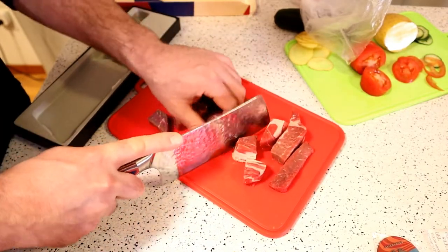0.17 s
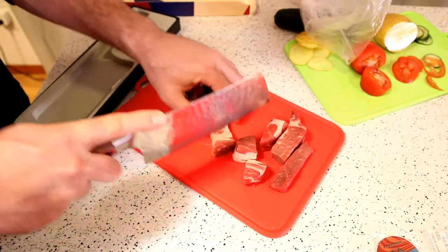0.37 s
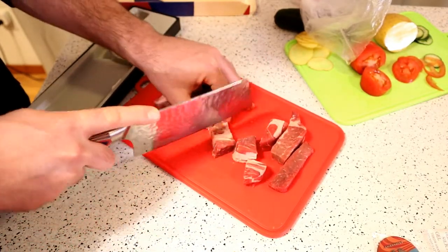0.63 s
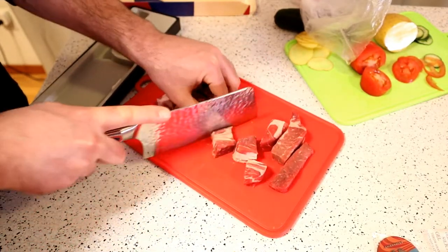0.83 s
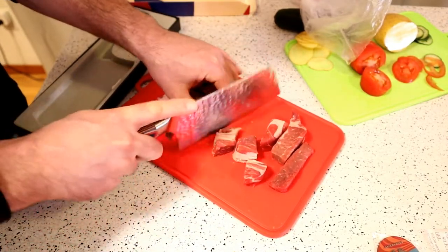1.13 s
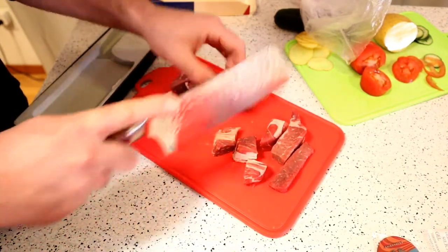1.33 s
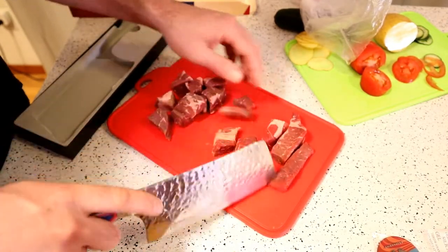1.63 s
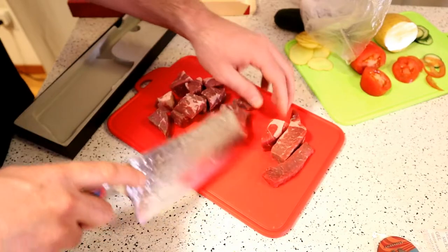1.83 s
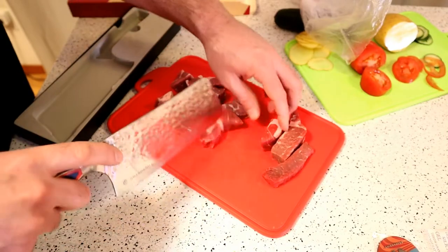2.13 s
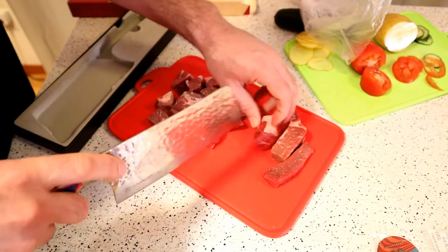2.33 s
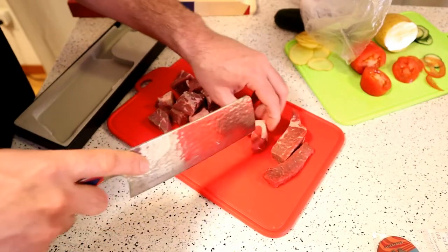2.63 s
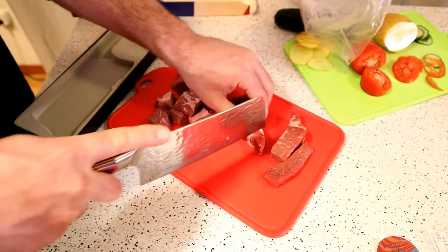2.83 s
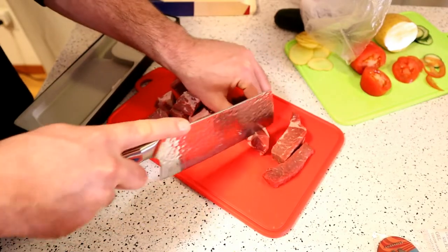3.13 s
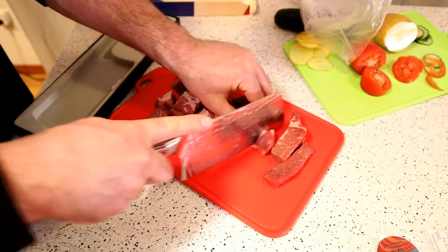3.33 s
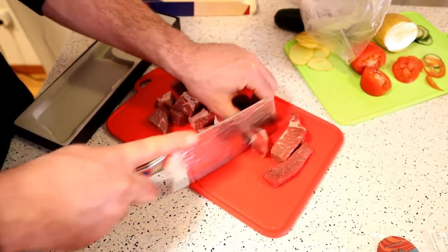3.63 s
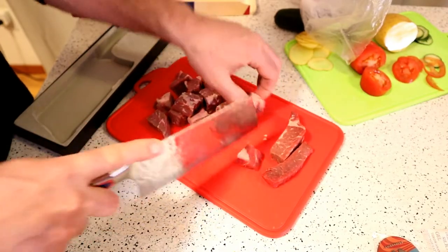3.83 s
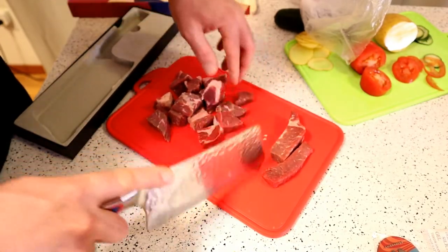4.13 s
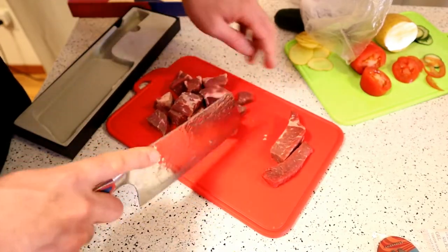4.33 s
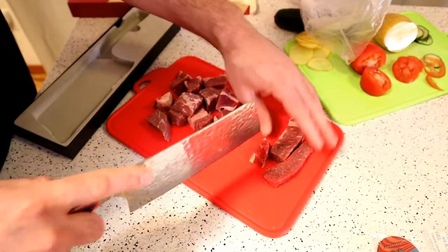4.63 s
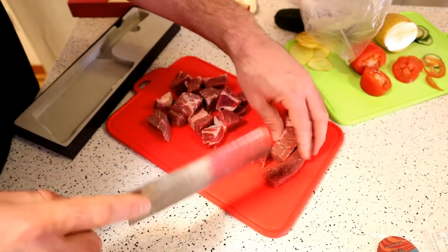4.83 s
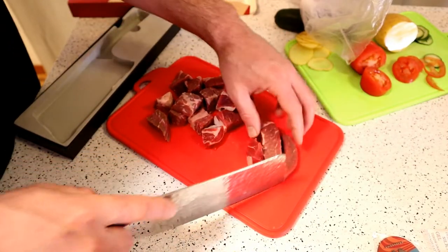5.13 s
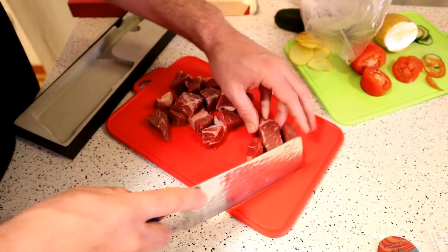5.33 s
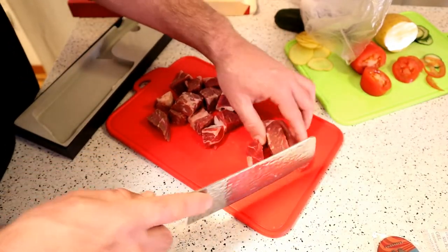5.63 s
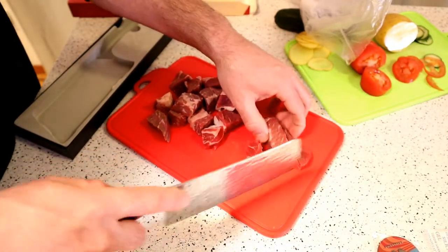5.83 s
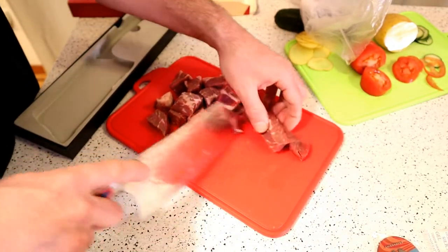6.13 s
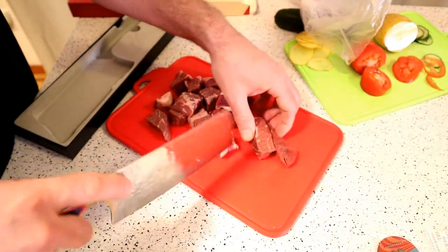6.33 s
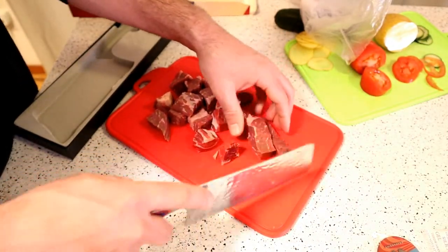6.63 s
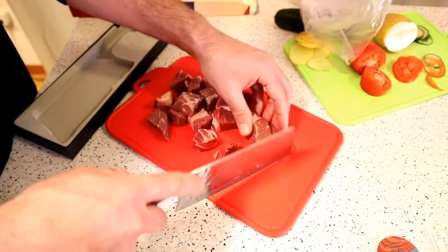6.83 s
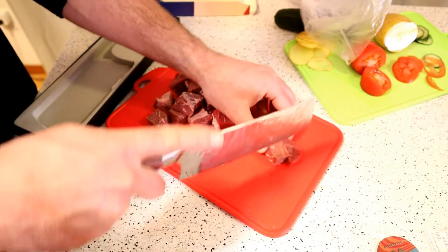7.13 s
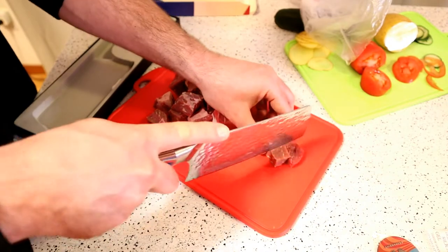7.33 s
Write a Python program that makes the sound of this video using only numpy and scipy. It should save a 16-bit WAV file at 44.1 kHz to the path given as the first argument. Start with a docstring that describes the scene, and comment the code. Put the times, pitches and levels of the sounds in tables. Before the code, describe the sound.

Loud cleaver knocks on a plastic cutting board come in irregular bursts, with dragging scrapes and faint wet meat ticks between them.

```python
"""A knock already dying away opens the scene: a cleaver cuts meat on a plastic board, an arm's length off.
Each stroke rings board and counter modes and adds a noise crack; the loudest knocks clip.
Between strokes the dragged edge scrapes (uneven noise through resonances), the steel rings in decaying modes,
and wet meat ticks and rustles in band noise. Two diffuse tails and a wall slap make the small kitchen;
shaped noise is its air, narrow noise bands the hum of a fridge."""
import sys
import numpy as np
from scipy import signal
from scipy.fft import rfft, irfft
from scipy.io import wavfile

SR = 44100
rng = np.random.default_rng(int(sys.argv[2]) if len(sys.argv) > 2 else 0)


def put_to_file(sound):
    """Save the sound as 16-bit audio at rate SR, in the file named by the first command-line argument."""
    columns = np.atleast_2d(sound).T  # one column per channel
    safe = np.clip(columns, -1, 1)
    whole_steps = np.round(safe * 32767)
    wavfile.write(sys.argv[1], SR, whole_steps.astype(np.int16))


N = 330288
LEAD = 2048  # samples kept ahead of time zero, for the stroke that starts there
SWAY_HZ = 33.3  # the counter on its frame

# Modes of the freely ringing steel. Each row: pitch in Hz, level in dB, t60 in s.
BLADE_MODES = [(2519, -4, .12), (3278, -12, .12), (4180, -14, .15), (5030, -14, .1), (5722, -2, .2),
               (6374, 0, .2), (7100, -14, .3), (7400, -14, .2), (8516, -4, .14), (8786, -14, .15),
               (10080, -5, .12), (10470, -12, .12), (10800, -14, .15), (11580, -11, .12), (12270, -14, .1),
               (13040, -16, .1), (14500, -16, .08)]


def undb(db):
    """Gain of a level in dB."""
    return 10 ** (np.asarray(db) / 20)


def band(x, hz, width_hz):
    """Two-pole resonance, gain 1 at the centre."""
    return signal.lfilter(*signal.iirpeak(hz, hz / width_hz, fs=SR), x)


def steep_band(x, hz, width_hz):
    """The same resonance twice in a row, for steeper skirts."""
    return band(band(x, hz, width_hz), hz, width_hz)


def level(x, db):
    """Set the rms in dB."""
    return x * undb(db) / np.sqrt(np.mean(x ** 2))


def fade(t60_s, count):
    """Exponential decay over count samples, 60 dB down at t60."""
    return np.exp(-np.log(1000) * np.arange(count) / SR / t60_s)


def walk(rate_hz, size):
    """Random drift of spread near 1 that takes a new aim rate_hz times a second."""
    aims = rng.standard_normal(size=2000)
    # sqrt(1.5) restores the spread lost between aims
    return np.sqrt(1.5) * np.interp(np.arange(size) * rate_hz / SR, np.arange(len(aims)), aims)


def burst(hz, width_hz, t60_s, count=2048):
    """A short dying noise around one band, peak 1."""
    y = steep_band(rng.standard_normal(count) * fade(t60_s, count), hz, width_hz)
    return y / np.abs(y).max()


def ring(modes, scatter_db, detune, contact_ms, spot_hz, focus_db_per_octave, count=22050):
    """One blow, peak 1: the spot that is hit favours the modes near spot_hz; a longer push is duller."""
    t = np.arange(count) / SR
    y = np.zeros(count)
    for hz, db, t60_s in modes:
        sign_draw, level_draw, pitch_draw = rng.standard_normal(3)
        octaves_off = abs(np.log2(hz / spot_hz))
        share = undb(db + scatter_db * level_draw - focus_db_per_octave * octaves_off)
        # more modes first swing away from the microphone than towards it
        sign = np.sign(sign_draw - .4)
        tone = np.sin(2 * np.pi * hz * (1 + detune * pitch_draw) * t)
        y += sign * share * tone * fade(t60_s, count)
    # double low-pass at 1000 / contact_ms Hz
    pole = np.exp(-2000 * np.pi / (SR * max(contact_ms, .01)))
    y = signal.lfilter([1], [1, -2 * pole, pole ** 2], y)
    return y / np.abs(y).max()


def add(track, s, x):
    """Mix a sound in at time s."""
    i = int(s * SR) + LEAD
    track[i:i + len(x)] += x[:len(track) - i]


def background():
    """Steady room air and microphone hiss, the wavering hum of the fridge, the counter's restless sway."""
    # Spectrum of air and hiss. Each row: frequency in Hz, relative density in dB.
    air_curve = np.array([(29, -47), (50, -9.5), (119, -6.5), (223, -10), (258, 2), (284, -15.5),
                          (337, -14), (545, -18), (678, -19), (1120, -24), (2060, -26.5), (9410, -31.5),
                          (16000, -37)])
    # Hum. Each row: pitch in Hz, width in Hz, rms level in dB.
    hum_bands = [(136, 0.5, -75.5), (251.3, 2.7, -74)]
    air_db, sway_rest_db = -50.5, -60.5  # rms
    hz = np.maximum(np.arange(N // 2 + 1) * SR / N, 1)
    shape = undb(np.interp(np.log(hz), np.log(air_curve[:, 0]), air_curve[:, 1]))
    air = level(irfft(rfft(rng.standard_normal(N)) * shape, N), air_db)
    hum = sum(level(band(rng.standard_normal(N), f, width_hz), db) for f, width_hz, db in hum_bands)
    sway = steep_band(rng.standard_normal(N), SWAY_HZ, 14) * undb(2.7 * walk(3.4, N))
    return air + hum + level(sway, sway_rest_db)


def diffuse(count=30000):
    """One diffuse tail that builds up gradually and dies band by band."""
    # Kitchen reverberation. Each row: band in Hz, level in dB, t60 in s.
    tail_bands = [(136.6, -2.5, 0.091), (231.6, 0, 0.31), (440, -3.5, 0.32), (1050, -7, 0.4),
                  (1850, -6, 0.35), (4010, -7.5, 0.37), (7860, -11.5, 0.41), (13000, -38.5, 0.033)]
    build = 1 - fade(0.031, count)
    tail = np.zeros(count)
    for hz, db, t60_s in tail_bands:
        noise = steep_band(rng.standard_normal(count), hz, 0.82 * hz)
        part = noise * fade(t60_s, count) * build
        tail += undb(db) * part * np.sqrt(hz / SR / np.sum(part ** 2))
    return tail


def kitchen(x):
    """Hands and blade move about, so every blow meets another blend of two tails; the far wall slaps dully."""
    turns_per_s, far_wall_s, far_wall_db = .6, .043, -8.5
    turn = 2 * np.pi * turns_per_s * np.arange(len(x)) / SR
    wet = sum(signal.fftconvolve(x * share, diffuse())[:len(x)] for share in (np.cos(turn), np.sin(turn)))
    slap = band(np.roll(x, int(far_wall_s * SR)), 170, 190)
    return x + wet + undb(far_wall_db) * slap


def rustle():
    """Hands move the meat: soft grainy band noise swells and fades in the treble."""
    # Each row: loudest moment in s, half length in s, level in dB.
    swells = [(.3, 0.49, -68), (2.0, 0.17, -70), (3.402, 0.076, -56), (6.503, 0.42, -60.5), (7.27, .1, -65)]
    t = (np.arange(N + LEAD) - LEAD) / SR
    swell = sum(undb(db) * np.clip(1 - ((t - s) / half_s) ** 2, 0, 1) for s, half_s, db in swells)
    grain = rng.standard_normal(len(t)) * undb(2.5 * walk(40, len(t)))
    return swell * level(steep_band(grain, 5000, 2000), 0)


def wet_ticks():
    """Sticky meat lets go: very short bursts of band noise."""
    # Each row: start in s, peak level in dB, pitch in Hz.
    snaps = [(.13, -39, 5000), (0.239, -46, 4200), (.486, -38, 5200), (.603, -46, 7000),
             (1.8157, -33.5, 8700), (2.0494, -38, 6080), (2.21, -44.5, 10500), (2.3306, -42, 5940),
             (2.361, -40.5, 6950), (2.6449, -44, 7570), (2.7332, -44, 9200), (2.8065, -44.5, 4710),
             (2.825, -44, 7790), (3.1783, -31.5, 5150), (3.2687, -42, 4460), (3.3365, -40, 5640),
             (3.3954, -34.5, 6100), (3.4207, -37.5, 5870), (4.4238, -37, 4400), (4.702, -42.5, 3540),
             (4.918, -29.5, 3600)]
    out = np.zeros(N + LEAD)
    for s, db, hz in snaps:
        add(out, s, undb(db) * burst(hz, 0.9 * hz, 0.011))
    return out


def scrapes():
    """Dense uneven slips of the edge drive the board's broad resonances and the steel's thin ones."""
    # Each row: full pressure at s, rise in s, hold in s, fall in s, level in dB, steel over board in dB.
    drags = [(0.204, 0.11, 0.058, .06, -54, -20), (.935, 0.07, .008, .005, -47, 1),
             (1.078, 0.093, .02, 0.14, -36, 0), (1.738, 0.017, .012, .03, -52.5, -2),
             (1.954, 0.17, .06, .09, -51, 8.5), (3.441, 0.048, .008, .005, -44.5, -5),
             (3.681, 0.047, .18, 0.028, -40, 4), (4.919, 0.012, .006, 0.024, -44, -10.5),
             (4.979, 0.012, .03, 0.05, -32.5, -23), (5.325, 0.062, .03, 0.066, -35.5, -5.5),
             (5.724, .03, .012, .04, -53.5, 11), (5.77, .006, 0.013, 0.026, -50, -14),
             (5.835, .006, .012, 0.025, -42, -10.5), (5.871, .04, .06, 0.053, -47, -13),
             (6.12, 0.021, 0.032, 0.0063, -30.5, 18), (7.223, 0.037, .07, 0.044, -64.5, -5)]
    # Board and pressed steel under the edge. Each row: pitch in Hz, width in Hz, level in dB.
    rubbed = [(962, 230, 1.5), (1270, 300, 1.5), (1750, 640, -3.5), (2385, 260, -2), (2670, 510, -4),
              (3235, 120, -5.5), (3730, 450, -2), (4600, 140, -5), (5230, 540, -4), (6200, 330, -6.5),
              (7430, 230, -12), (8550, 420, -15.5), (9200, 1200, -28.5)]
    swell_db = 20  # gained over the rise, lost over the fall
    biggest_slip_db = 18
    size = N + LEAD
    t = (np.arange(size) - LEAD) / SR
    slip_db = np.minimum(3 * rng.exponential(size=size), biggest_slip_db)
    slips = level(rng.standard_normal(size) * undb(slip_db + walk(80, size)), 0)
    board, steel = np.zeros(size), np.zeros(size)
    for s, rise_s, hold_s, fall_s, db, steel_db in drags:
        # 0 under full pressure, 1 a rise before and a fall after; the edge lifts off beyond that
        away = np.maximum(np.maximum((s - t) / rise_s, (t - s - hold_s) / fall_s), 0)
        pressure = undb(db - swell_db * away) * np.clip(2 - away, 0, 1)
        board += pressure
        steel += pressure * undb(steel_db)
    rub, sing = 0, 0
    # the contact moves along the edge, so each resonance swells on its own
    for hz, width_hz, db in rubbed:
        swell = undb(db + 3 * walk(18, size))
        tone = band(band(slips * board, hz, 3 * width_hz), hz, width_hz)
        rub += swell * tone * np.sqrt(SR / width_hz)
    for hz, db, t60_s in BLADE_MODES:
        swell = undb(db + 2 * walk(9, size))
        sing += swell * band(slips * steel, hz, 1.6 / t60_s) * np.sqrt(SR * t60_s)
    return undb(-10.5) * rub + undb(-33.5) * sing


def blade():
    """Steel struck on its flat rings, with the tick of the contact; what touches it shortens the ring."""
    # Each row: start in s, ring peak in dB, tick over ring in dB, favoured pitch in Hz, t60 over free t60.
    taps = [(6.1608, -11, -12, 6370, 0.76), (6.2592, -16.5, 6, 8500, 0.56)]
    retouch_damp_db = 9
    out = np.zeros(N + LEAD)
    for s, db, tick_db, spot_hz, freedom in taps:
        modes = [(hz, mode_db, t60_s * freedom) for hz, mode_db, t60_s in BLADE_MODES]
        steel = ring(modes, 0.93, 0, 0.11, spot_hz, 0.83)
        tick = undb(tick_db) * burst(5100, 8000, 0.035, count=22050)
        out[int(s * SR) + LEAD:] *= undb(-retouch_damp_db)  # a new touch chokes what still rings
        add(out, s + 0.001013, undb(db) * (steel + tick))
    return out


def knocks():
    """Blade or hand lands: board modes and slap, counter thud and sway, a short crack of the edge."""
    # Each row: start in s, peak levels of knock, thud, crack and sway in dB ahead of the filters,
    # contact in ms, knock pitch in Hz, thud pitch in Hz.
    strokes = [(-.022, 2.5, -16.5, -11.5, -40, 0.076, 960, 165),
               (0.354, -56, -44, -56, -70, 0.31, 466, 253), (.464, -44, -40, -51, -53, 0.55, 468, 205),
               (0.487, -37.5, -36.5, -44.5, -70, .35, 960, 264), (.82, -18, -23.5, -60, -41, 1, 790, 210),
               (.944, -3, -19, -50, -54, 0.36, 895, 334), (.975, -16, -14.5, -56, -60, 0.52, 940, 266),
               (1.085, -15, -22, -37, -43, 0.59, 800, 210), (1.78, -17.5, -23.5, -57, -40, 0.86, 780, 207),
               (2.51, -34.5, -31, -51, -56, 1, 484, 280), (2.697, -43.5, -53, -44.5, -67, 0.32, 942, 258),
               (3.196, -20.5, -23, -53.5, -49, 1, 791, 205), (3.4525, 3, -11, -18, -54.5, 0.31, 880, 239),
               (3.929, -25.5, -28.5, -64.5, -47.5, 1, 775, 205),
               (4.293, -0.5, -13, -15, -45, .34, 980, 223), (4.407, -20.5, -22, -55, -42.5, 1, 790, 199),
               (4.876, -10.5, -16, -40.5, -35.5, 0.37, 784, 207),
               (5.1322, 4, -7.5, -11, -51.5, .32, 1364, 223), (5.382, -22.5, -24, -50, -50, 0.43, 800, 207),
               (5.655, -25.5, -25, -48, -50.5, 1, 734, 242),
               (5.79, -34, -25.5, -45.5, -53.5, .95, 754, 256),
               (5.822, -22, -29, -24.5, -56, 0.18, 911, 210), (6.03, 3, -35.5, -2, -49, .17, 822, 350),
               (6.033, 0, -15, -11.5, -60, 0.25, 1350, 198), (6.093, -10, -26, -32, -62, 0.23, 940, 256),
               (6.16, -14, -47, -18, -60, 0.29, 1350, 288), (6.257, -18, -30, -20, -55, 0.29, 950, 291),
               (6.793, 4, -8.5, -3, -37, 0.39, 1300, 186), (6.901, -22, -27, -57, -60, 1, 1350, 237),
               (7.135, -34, -32, -62, -56, 1, 545, 245)]
    # Modes of the board, then of the counter. Each row: pitch in Hz, level in dB, t60 in s.
    board_modes = [(505, -6.5, 0.041), (576, -8.5, 0.03), (676, -5.5, 0.027), (793.3, -8, 0.12),
                   (904, -22, 0.34), (929, 1, 0.062), (1056, -1, 0.0091), (1342.4, -0.5, 0.046),
                   (1390, -27, 0.46), (1448, -1, 0.015), (1804, -4.5, 0.034), (2012, -1.5, 0.0184),
                   (2263, 1, 0.018), (2585, 2, 0.02), (2810, -14, .025), (3030, -13, 0.014),
                   (3634, -8, 0.024), (3980, -15, 0.023)]
    counter_modes = [(81, -2, 0.18), (118, -4, 0.048), (168.3, -9, 0.12), (214, 5.5, 0.068),
                     (279.7, 5, 0.061), (325, -4, 0.18), (407, -13, 0.018)]
    sway_rise_s, sway_t60_s = .04, 0.41
    board, rest, sway = np.zeros(N + LEAD), np.zeros(N + LEAD), np.zeros(N + LEAD)
    t = np.arange(SR // 2) / SR
    swing = np.sin(2 * np.pi * SWAY_HZ * t) * fade(sway_t60_s, len(t)) * np.minimum(t / sway_rise_s, 1)
    for s, knock_db, thud_db, crack_db, sway_db, contact_ms, knock_hz, thud_hz in strokes:
        add(board, s + .0007, undb(knock_db) * ring(board_modes, 1.7, .02, contact_ms, knock_hz, 5.6))
        # the board slaps the counter: a dense rattle, brighter after a short contact
        slap_hz = min(450 / contact_ms, 2500)
        add(board, s + 0.00099, undb(knock_db - 11.5) * burst(slap_hz, 0.7 * slap_hz, 0.038, count=4096))
        thud = ring(counter_modes, 1.2, 0.014, 2.1, thud_hz, 9.6, count=8192)
        add(rest, s + 0.0015, undb(thud_db) * thud)
        add(rest, s + 0.00076, undb(crack_db) * burst(3140, 3500, 0.036))
        add(sway, s, undb(sway_db) * swing / swing.max())
    # the edge lands along its length
    board += 0.2 * np.roll(board, int(0.001654 * SR))
    # the board radiates little deep bass; the counter and crack lose what lies below 70 Hz
    board = signal.sosfilt(signal.butter(2, 250, "high", fs=SR, output="sos"), board)
    rest = signal.sosfilt(signal.butter(2, 70, "high", fs=SR, output="sos"), rest)
    return board + rest + sway


def scene():
    """All that happens on the board sounds through the kitchen, over its background."""
    on_board = rustle() + wet_ticks() + scrapes() + blade() + knocks()
    return (kitchen(on_board)[LEAD:] + background())[None]


def record(dry):
    """The input clips at full scale and the top above 16.2 kHz is cut."""
    clipped = np.clip(dry, -1, 1)
    return signal.sosfilt(signal.ellip(10, .2, 60, 16200, fs=SR, output="sos"), clipped)


dry = scene()
out = record(dry)
put_to_file(out)
```